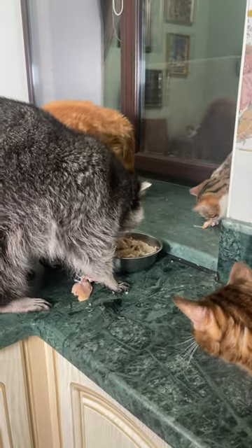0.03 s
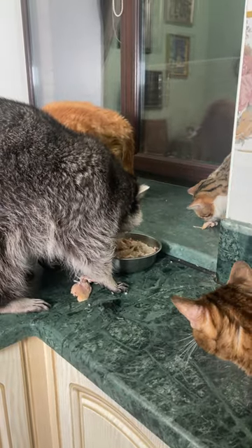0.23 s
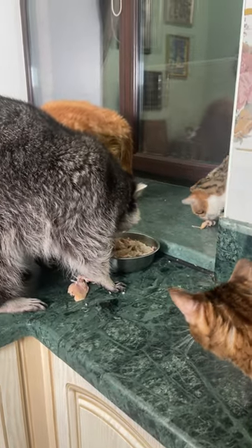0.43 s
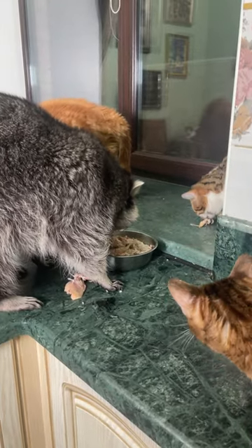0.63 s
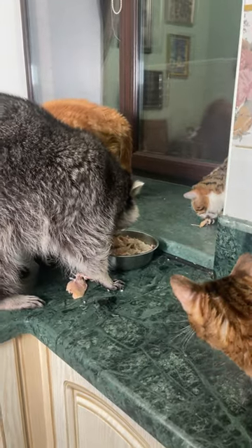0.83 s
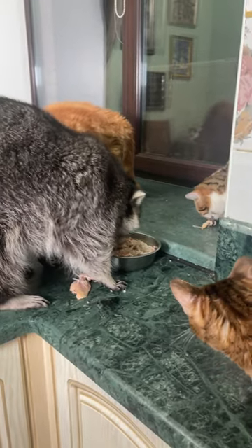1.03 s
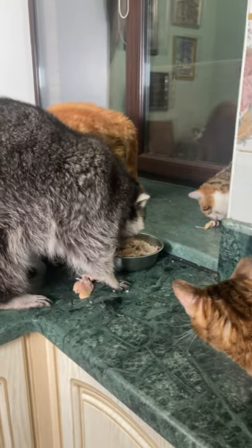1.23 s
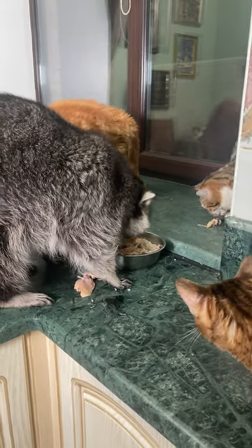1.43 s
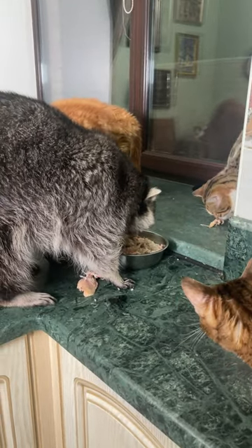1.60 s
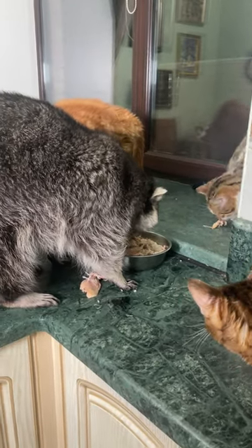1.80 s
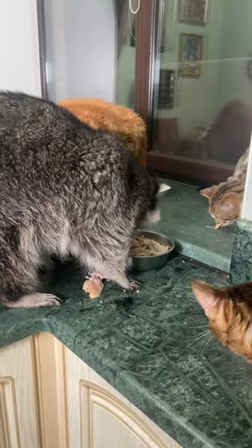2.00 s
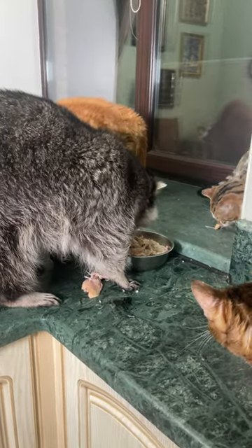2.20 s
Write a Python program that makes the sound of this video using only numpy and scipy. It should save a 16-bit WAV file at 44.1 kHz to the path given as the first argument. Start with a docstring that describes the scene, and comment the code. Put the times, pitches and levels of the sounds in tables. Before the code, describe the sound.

Five harsh, high squawks from a nearby raccoon echo briefly in a kitchen, each swelling from a pinched squeal into a hissing rasp. A quiet animal growl dies away early, leaving faint electrical hum and room rumble underneath.

```python
"""A raccoon at a food bowl squawks five times in a hard-walled kitchen. Each call is air noise shaped
by the throat: a pinched, breathy squeal climbs and swells, then breaks into an open rasp whose
resonances sink as the throat relaxes. A near wall echoes the calls and the room rings.
A low animal growl fades under the first calls; mains hum and room rumble lie beneath."""
import sys
import numpy as np
from scipy import signal
from scipy.fft import rfft, irfft, next_fast_len
from scipy.io import wavfile
from scipy.ndimage import map_coordinates

SR = 44100
rng = np.random.default_rng(int(sys.argv[2]) if len(sys.argv) > 2 else 0)


def wrap_up_sound(samples):
    """Save the sound to the file named by the first command line argument, as 16-bit audio."""
    columns = np.atleast_2d(samples).T
    # keep every value between -1 and 1, then stretch to whole-number steps
    tamed = np.clip(columns, -1, 1)
    steps = np.round(tamed * 32767).astype(np.int16)
    wavfile.write(sys.argv[1], SR, steps)


N = 103635

# Room rumble spectrum. Each row: frequency in Hz, relative level in dB.
RUMBLE_SPECTRUM = [(25, -54), (52, 3.5), (75, -0.5), (125, -18.5), (180, -3.5), (320, -7), (500, -15.5),
                   (1000, -29), (3000, -14), (8000, -81), (12000, -32)]
# Mains hum. Each row: frequency in Hz, level in dB.
HUM_TONES = [(54, -75.5), (101, -61.5), (162, -71.5)]
# Diffuse room noise. Each row: frequency in Hz, left-right correlation.
COHERENCE = [(150, 0.9825), (350, 0.94), (700, 0.36), (3000, 0.11)]
# Room decay. Each row: frequency in Hz, time to fall 60 dB in seconds.
REVERB_T60 = [(500, 0.96), (2500, 0.5), (4000, 0.52), (7000, .5), (11000, 0.57)]
# Reverb colour. Each row: frequency in Hz, gain in dB.
REVERB_GAIN = [(1000, 0.5), (3000, 5), (4200, -2), (5800, 6.5), (8000, -6.5), (11000, -9)]
# Microphone response. Each row: frequency in Hz, gain in dB.
MIC_RESPONSE = [(1000, -1), (8000, 3), (11000, 4), (11600, -1.5), (12300, -44)]
# Growl contour. Each row: time in seconds, pitch in Hz, tone level in dB, noise level in dB.
GROWL_CONTOUR = [(0, 155.2, -49.5, -42), (0.082, 162.8, -46.5, -46), (0.148, 200.6, -43.5, -46.5),
                 (0.218, 199.6, -49, -48), (0.292, 168.8, -47, -48), (0.409, 158.4, -48, -50),
                 (.48, 107.7, -50, -48.5), (0.602, 98.5, -47, -53.5), (0.661, 88.05, -67, -55),
                 (0.732, 70.7, -52, -52.5), (.9, 61.2, -56.5, -63), (1.551, 59.8, -72.5, -60.5),
                 (1.8, 60.3, -75, -61)]
# Growl noise spectrum. Each row: frequency in Hz, relative level in dB.
GROWL_SPECTRUM = [(60, -28), (150, -1.5), (310, 1.5), (500, -11), (800, -12), (1300, -22.5), (3000, -31.5),
                  (10000, -45.5)]
# Open throat resonances. Each row: multiple of the throat resonance, half width in Hz, gain in dB.
THROAT_PEAKS = [(0.792, 310, 7), (1.048, 346, 9)]
# Mouth resonances in the rasp. Each row: multiple of the top pitch, half width in Hz, gain in dB.
MOUTH_PEAKS = [(1.4, 800, 3), (1.948, 800, 2), (2.4, 1300, -8.5)]
# Squeal resonances. Each row: multiple of the pitch, half width in Hz, gain in dB.
SQUEAL_PEAKS = [(1, 261, 12.5), (1.95, 510, -3), (2.72, 560, -13.5)]
# Mouth turbulence. Each row: frequency in Hz, relative level in dB.
HISS_SPECTRUM = [(700, -47), (1380, -48), (1750, 16.5), (2150, 17), (3200, 16.5), (4600, 14), (5600, 15.5),
                 (7500, 1), (9200, -37), (10700, -3), (12000, -34)]
# The calls. Each row: start, break and end in seconds, squeal, rasp and hiss gains in dB,
# first and top pitch in Hz, squeal width factor, overtone gain in dB, throat resonance in Hz,
# gain of the lowest resonance in dB.
CALLS = [(0.177, 0.33, 0.47, -23.5, -29, -47.5, 3290, 4150, 0.54, 2, 2980, 1.5),
         (0.543, 0.717, 0.84, -25, -26, -36, 3060, 4094, 1.14, 6.5, 2950, 1),
         (0.932, 1.096, 1.219, -22, -25.5, -33, 3223, 4024, 0.98, 1.5, 2815, -27),
         (1.328, 1.497, 1.625, -24, -25, -33, 3150, 3938, 1.43, 7.5, 2855, 1),
         (1.762, 1.934, 2.053, -26, -28.5, -32.5, 2700, 3758, 1.5, 3.5, 2520, -6)]

TOP_HZ, RUMBLE_DB = 12800, -58.5
DIRECT_LAG_S, WALL_DELAY_S, WALL_LAG_S, WALL_DB = 0.00017, 0.0057, 0.000404, -7
GROWL_OVERTONE_DB, GROWL_JITTER, GROWL_RELEASE_S = -10, 0.0585, 0.091
RASP_ATTACK_S, RASP_RELEASE_S, RASP_FADE_DB_PER_S = 0.033, 0.19, 53.5
THROAT_SINK, MOUTH_SINK, SINK_S = 0.59, 0.22, 0.024  # resonances start higher by these fractions
LOW_RATIO, LOW_WIDTH_HZ, LOW_DELAY_S = 0.54, 170, 0.036  # the lowest resonance opens last
LINGER_RATIO, LINGER_WIDTH_HZ, LINGER_DB = 1.03, 79, 16  # thin whistle through the rasp
SQUEAL_ATTACK_S, SQUEAL_RELEASE_S = 0.043, 0.065
SWELL_DB, SWELL_POWER, CLIMB_POWER = 17, 2.33, 1.77
HISS_PINCH_DB = 19  # hiss weakens as the squeal tightens
TREBLE_HZ, TREBLE_DULL_DB, TREBLE_OPEN_S = 3570, 5, 0.023  # hiss starts dull
FIZZ_DB, FIZZ_HZ, FIZZ_WIDTH_HZ = -46.5, 8650, 3630  # air on the teeth
NOTCH_RATIO, NOTCH_WIDTH_HZ, NOTCH_DB = 1.215, 312, 42


def amp(db):
    """Decibels to gain."""
    return 10 ** (np.asarray(db) / 20)


def unit_rms(x):
    """Scale to rms 1."""
    return x / np.sqrt(np.mean(x ** 2) + 1e-20)


def log_interp(points, hz):
    """Interpolate (Hz, value) points on a log frequency axis."""
    knots_hz, values = np.transpose(points)
    return np.interp(np.log(hz + 1), np.log(knots_hz + 1), values)


def wobble(rate_hz):
    """Smooth random curve, rate_hz knots a second."""
    return map_coordinates(rng.standard_normal(4096), [np.arange(N) * rate_hz / SR], mode="wrap")


def filtered(x, response):
    """Apply the frequency response response(hz)."""
    size = next_fast_len(N + SR // 2)
    return irfft(rfft(x, size) * response(np.fft.rfftfreq(size, 1 / SR)), size)[..., :N]


def ramp(u):
    """Smooth step from 0 to 1."""
    return np.sin(np.pi / 2 * np.clip(u, 0, 1)) ** 2


def resonance(hz, centre_hz, width_hz):
    """Steep-skirted peak, about half gain at width_hz off centre."""
    return (1 + ((hz - centre_hz) / (2 * width_hz)) ** 2) ** -3


def diffuse_noise(spectrum):
    """Stereo room noise of rms 1, near mono in the bass."""
    def mid_side_gain(hz):
        angle = np.arccos(np.clip(log_interp(COHERENCE, hz), -1, 1)) / 2
        return amp(log_interp(spectrum, hz)) * [np.cos(angle), np.sin(angle)]
    mid, side = filtered(rng.standard_normal((2, N)), mid_side_gain)
    return unit_rms(np.array([mid + side, mid - side]))


def hum_and_rumble():
    """Slightly unsteady appliance hum over room rumble."""
    t = np.arange(N) / SR
    hum = 0
    for hz, db in HUM_TONES:
        gain = amp(db + 0.5 * wobble(5.35))
        hum += gain * unit_rms(np.sin(2 * np.pi * hz * t + 0.86 * wobble(13)))
    return hum + amp(RUMBLE_DB) * diffuse_noise(RUMBLE_SPECTRUM)


def kitchen_reverb(x):
    """The room's ring: a decaying noise tail, different at each microphone."""
    hz, t, noise = signal.stft(rng.standard_normal((2, SR)), SR, nperseg=256)
    t60_s = log_interp(REVERB_T60, hz)[:, None]
    energy_norm = np.sqrt(2 * np.log(1000) / (t60_s * SR))
    tail = signal.istft(noise * 1000 ** (-t / t60_s) * energy_norm, SR, nperseg=256)[1]
    tail *= ramp(np.arange(tail.shape[1]) / SR / 0.0017)
    wet = signal.fftconvolve(x[None], tail, axes=1)[:, :N]
    return filtered(wet, lambda f: amp(log_interp(REVERB_GAIN, f)))


def arrival(x, delay_s, lag_s):
    """One path to two microphones; the left leads by lag_s."""
    delays_s = delay_s + lag_s * np.array([[-0.5], [0.5]])
    return filtered(x, lambda hz: np.exp(-2j * np.pi * hz * delays_s))


def growl():
    """Low rough tone that lifts, sags and dies; its noisy part lasts longer."""
    times_s, *columns = np.transpose(GROWL_CONTOUR)
    t = np.arange(N) / SR
    hz, tone_db, noise_db = [np.interp(t, times_s, column) for column in columns]
    phase = 2 * np.pi * np.cumsum(hz * (1 + GROWL_JITTER * wobble(86.3))) / SR
    tone = np.sin(phase) + amp(GROWL_OVERTONE_DB) * np.sin(2 * phase)
    rough_tone = unit_rms(tone * amp(1.5 * wobble(43.3)))
    release = 1 - ramp((t - times_s[-1]) / GROWL_RELEASE_S)
    return release * (amp(tone_db) * rough_tone + amp(noise_db) * diffuse_noise(GROWL_SPECTRUM))


def turbulence(shape, flutter_db):
    """Fluttering air noise through the moving gain shape(hz, t)."""
    air = rng.standard_normal(N) * amp(flutter_db * wobble(rate_hz=300))
    hz, t, frames = signal.stft(air, SR, nperseg=512)
    band = hz < TOP_HZ
    gain = np.zeros(frames.shape)
    gain[band] = shape(hz[band, None], t)
    return signal.istft(frames * gain, SR, nperseg=512)[1][:N]


def cavity_notch(hz, top_hz, depth_db):
    """A side cavity of the throat swallows a band just above the top pitch."""
    return amp(-depth_db * np.exp(-((hz - NOTCH_RATIO * top_hz) / NOTCH_WIDTH_HZ) ** 2 / 2))


def rasp_shape(hz, t):
    """After the break the throat opens and its resonances sink."""
    gain = 0
    for _, break_s, end_s, _, rasp_db, _, _, top_hz, _, _, throat_hz, low_db in CALLS:
        age_s = np.maximum(t - break_s, 0)
        tension = np.exp(-age_s / SINK_S)
        gate = ramp(age_s / RASP_ATTACK_S) * (1 - ramp((t - end_s) / RASP_RELEASE_S + 0.5))
        envelope = gate * amp(rasp_db - RASP_FADE_DB_PER_S * age_s)
        peaks = [amp(db) * resonance(hz, throat_hz * ratio * (1 + THROAT_SINK * tension), width_hz)
                 for ratio, width_hz, db in THROAT_PEAKS]
        peaks += [amp(db) * resonance(hz, top_hz * ratio * (1 + MOUTH_SINK * tension), width_hz)
                  for ratio, width_hz, db in MOUTH_PEAKS]
        low_gate = ramp((age_s - LOW_DELAY_S) / RASP_ATTACK_S)
        peaks.append(amp(low_db) * low_gate * resonance(hz, LOW_RATIO * throat_hz, LOW_WIDTH_HZ))
        peaks.append(amp(LINGER_DB) * resonance(hz, LINGER_RATIO * top_hz, LINGER_WIDTH_HZ))
        spectrum = np.sqrt(sum(peak ** 2 for peak in peaks))
        gain += envelope * cavity_notch(hz, top_hz, NOTCH_DB * tension) * spectrum
    return gain


def squeal_shape(hz, t):
    """The tight throat whistles higher and louder up to the break, over a hiss."""
    gain = 0
    for start_s, break_s, _, squeal_db, _, hiss_db, first_hz, top_hz, widen, overtone_db, _, _ in CALLS:
        slack = np.clip((break_s - t) / (break_s - start_s), 0, 1)
        attack = ramp((t - start_s) / SQUEAL_ATTACK_S + 0.5)
        release = 1 - ramp((t - break_s) / SQUEAL_RELEASE_S)
        pitch_hz = top_hz + (first_hz - top_hz) * slack ** CLIMB_POWER
        whistle = sum(amp(db + overtone_db * (k > 0)) * resonance(hz, ratio * pitch_hz, width_hz * widen)
                      for k, (ratio, width_hz, db) in enumerate(SQUEAL_PEAKS))
        whistle *= amp(squeal_db - SWELL_DB * slack ** SWELL_POWER)
        age_s = np.maximum(t - start_s, 0)
        dull_db = TREBLE_DULL_DB * ramp(hz / TREBLE_HZ - 0.5) * np.exp(-age_s / TREBLE_OPEN_S)
        hiss = amp(hiss_db + log_interp(HISS_SPECTRUM, hz) - HISS_PINCH_DB * (1.5 - slack) - dull_db)
        fizz = amp(FIZZ_DB) * resonance(hz, FIZZ_HZ, FIZZ_WIDTH_HZ)
        notch = cavity_notch(hz, top_hz, NOTCH_DB * (1 - slack))
        gain += attack * release * notch * np.hypot(whistle, hiss + fizz)
    return gain


def raccoon():
    """Squeal and rasp share one shaking effort."""
    squeals = turbulence(squeal_shape, flutter_db=2)
    rasps = turbulence(rasp_shape, flutter_db=2.5)
    shake_db = 0.18 * wobble(rate_hz=70)
    return (squeals + rasps) * amp(shake_db)


def scene():
    """Calls arrive direct, off a near wall and from the room, over growl, hum and rumble."""
    voice = raccoon()
    direct = arrival(voice, 0, DIRECT_LAG_S)
    wall_echo = amp(WALL_DB) * arrival(voice, WALL_DELAY_S, WALL_LAG_S)
    return direct + wall_echo + kitchen_reverb(voice) + growl() + hum_and_rumble()


def record(dry):
    """The microphones lift the treble slightly and cut its very top."""
    return filtered(dry, lambda hz: amp(log_interp(MIC_RESPONSE, hz)) * (hz < TOP_HZ))


dry = scene()
out = record(dry)
wrap_up_sound(out)
```